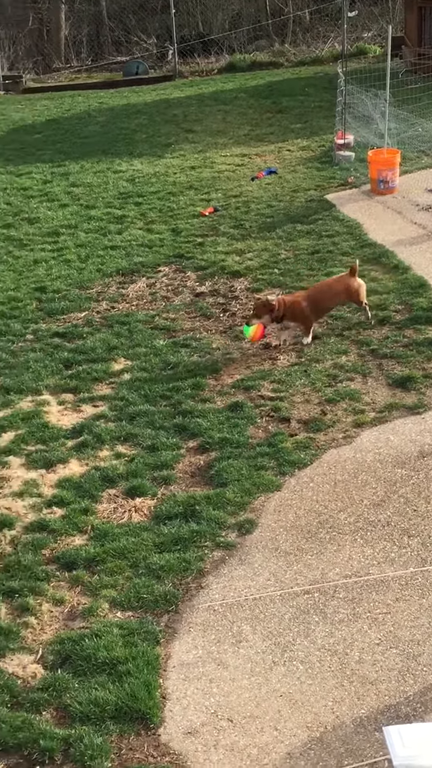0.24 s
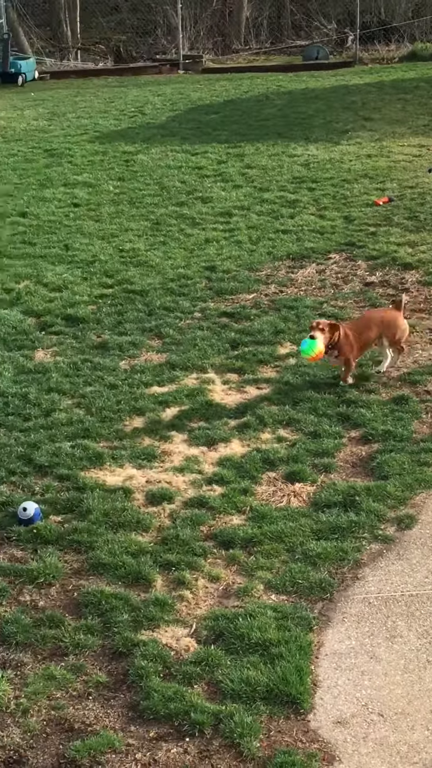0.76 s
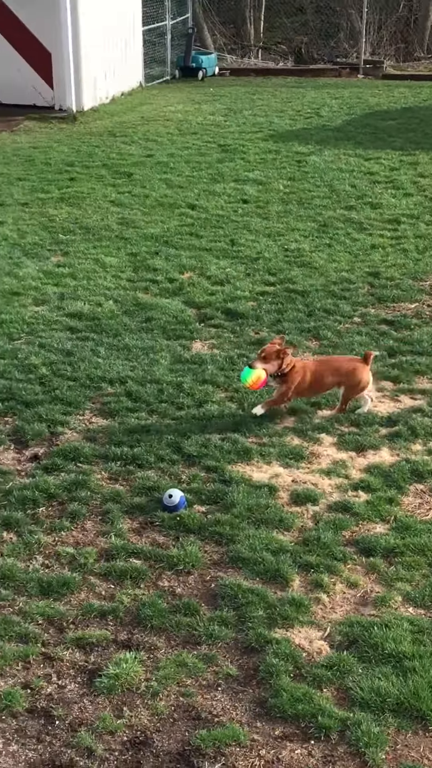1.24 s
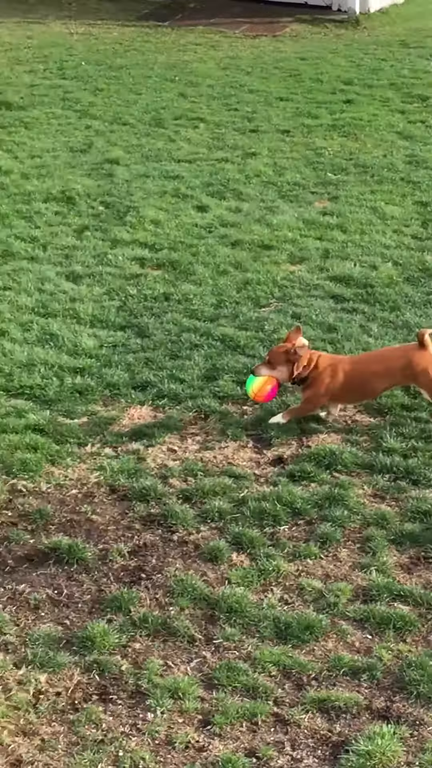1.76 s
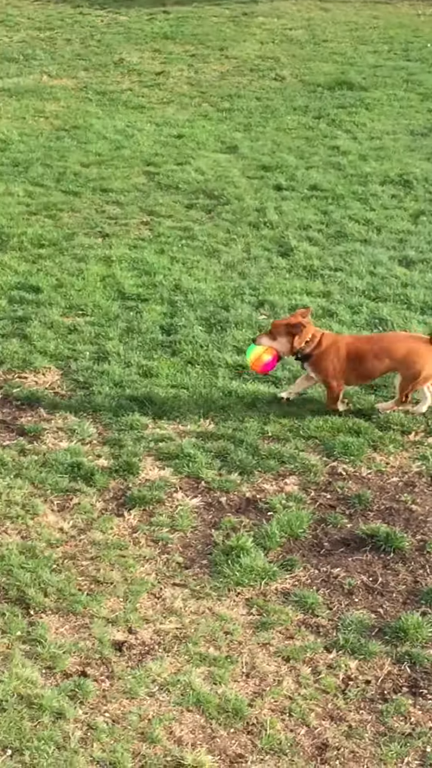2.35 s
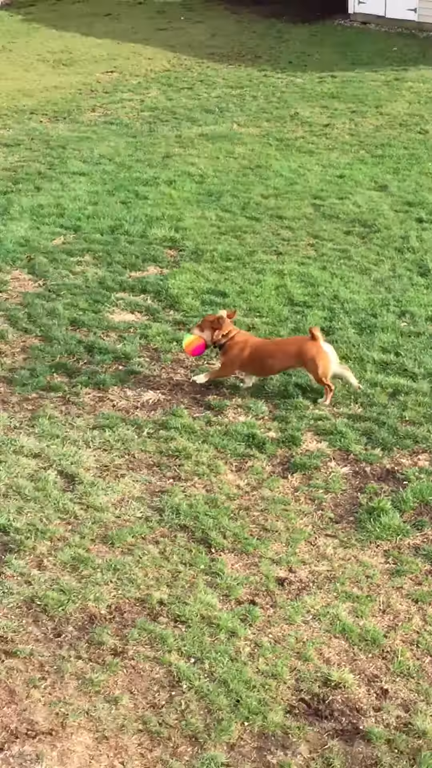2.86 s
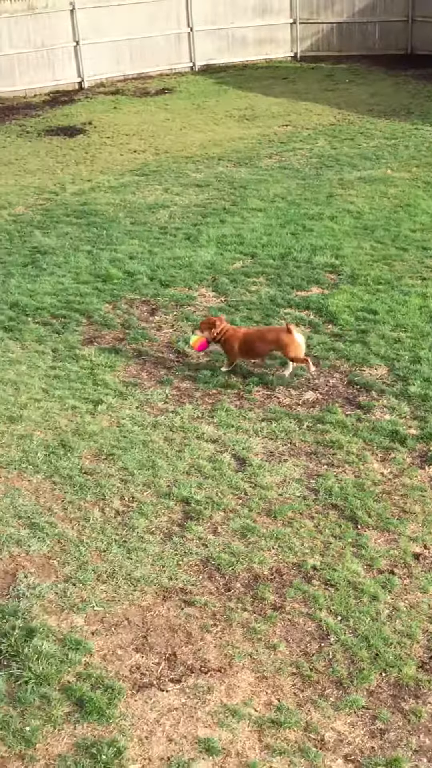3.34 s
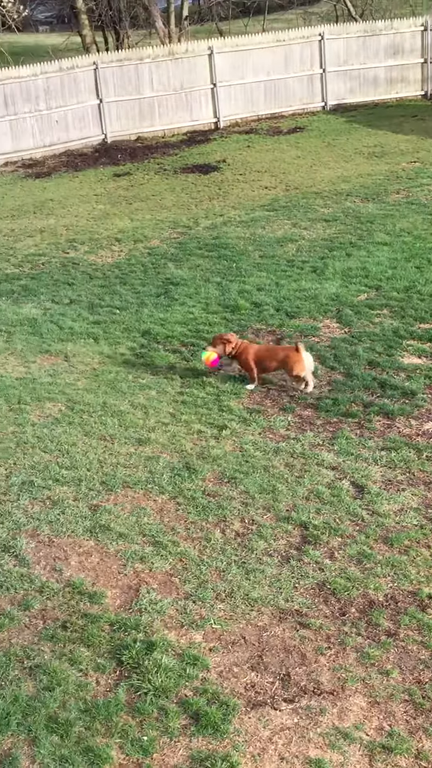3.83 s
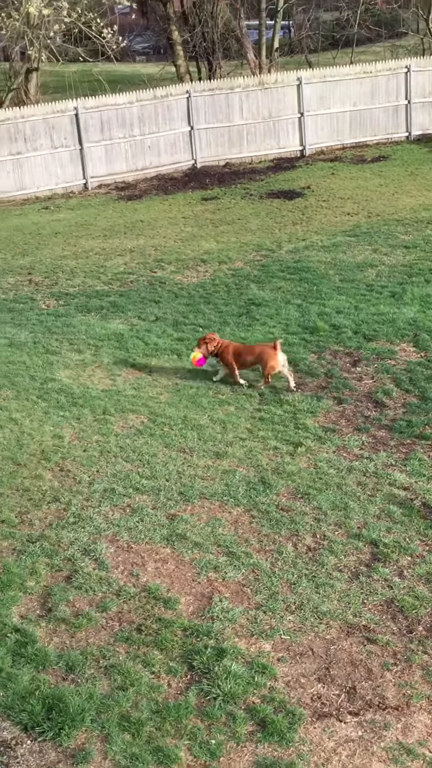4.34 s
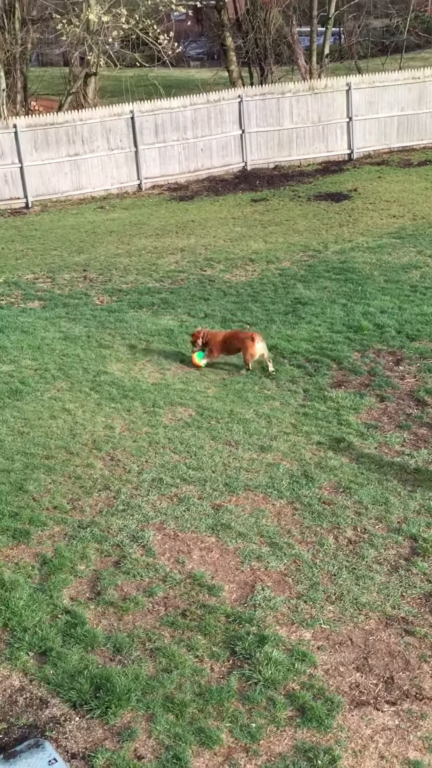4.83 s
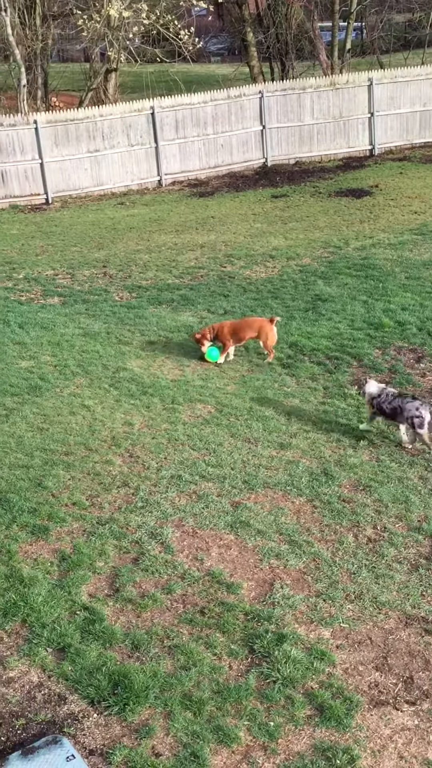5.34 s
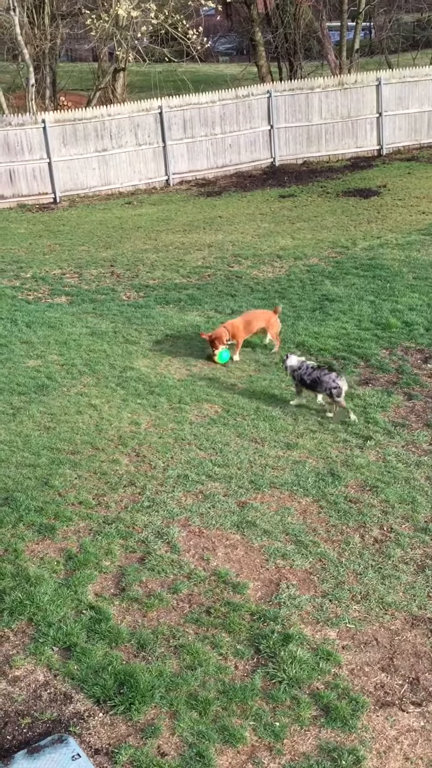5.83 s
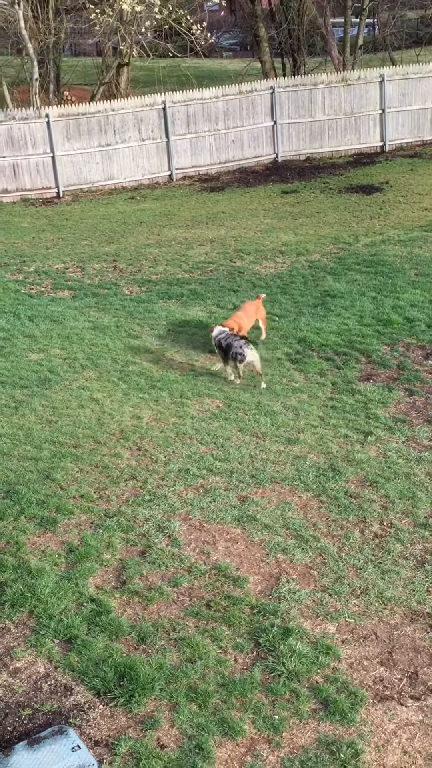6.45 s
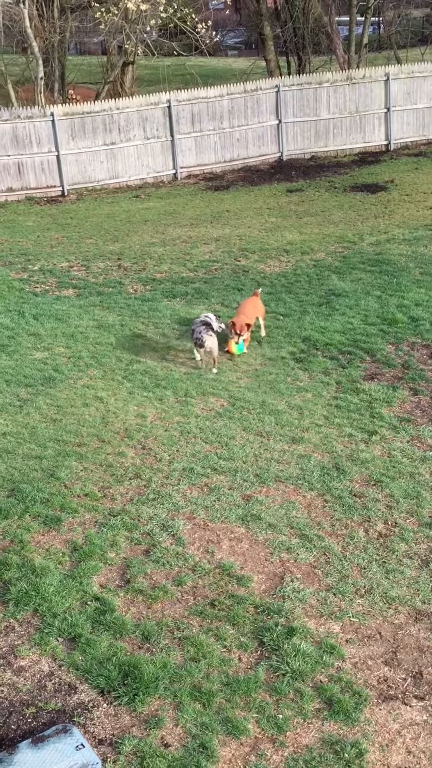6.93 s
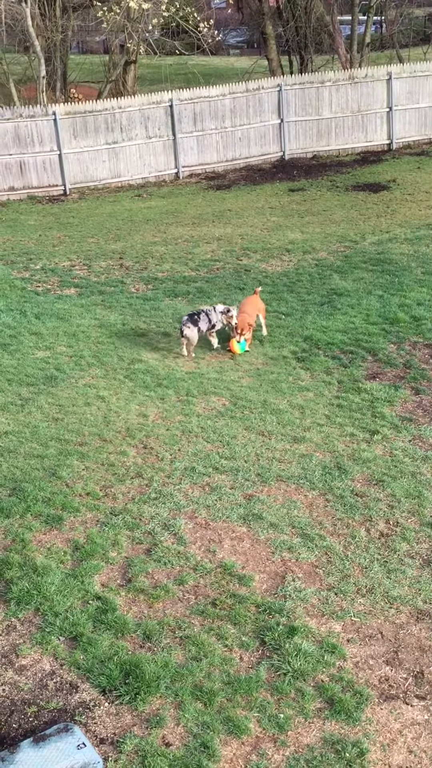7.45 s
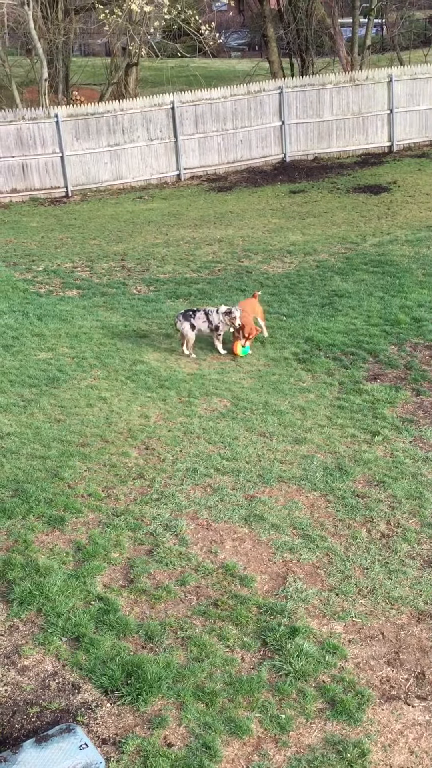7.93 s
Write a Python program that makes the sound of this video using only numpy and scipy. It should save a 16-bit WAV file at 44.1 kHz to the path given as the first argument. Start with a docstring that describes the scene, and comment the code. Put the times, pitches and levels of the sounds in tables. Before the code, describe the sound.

Metal dog tags jingle outdoors in light, irregular clusters for about eight seconds. They begin as dry, high clicks, busiest around 1 and 2 seconds and again near 4, then turn more ringing from about 4.5 seconds onward. Something hard and hollow is knocked now and then, most clearly at 3.6 seconds and again near 4.6 and 5. A bird chatters a quick run of about eight chirps from 4.5 to 5.2 seconds. At 7 seconds a dog gives one short, breathy snap among bright tag clashes. Far away, a faint caw comes near 2.2 seconds and a faint yelp near 4.1, with thin bird whistles scattered throughout. Underneath run a low rumble, a faint hum, soft outdoor hiss and barely audible scuffs in the grass. Light wind buffets the microphone, with a puff near 0.8 seconds and a swell around 7.

```python
"""Dog tags jingling on a lawn

Two dogs trot about a fenced lawn, and the metal tags on their collars clash, slide and ring.
Nearby, something hard and hollow is knocked, and a dog gives one gruff snap, a burst of air.
A bird chatters in two voices at once, while other birds whistle and animals call far away.
Under it all lie a low rumble, light wind on the microphone, a hum and faint scuffs in the grass."""
import sys
import numpy as np
from scipy import signal
from scipy.fft import rfft, irfft
from scipy.io import wavfile
from scipy.ndimage import uniform_filter1d

SR = 44100
rng = np.random.default_rng(int(sys.argv[2]) if len(sys.argv) > 2 else 0)


def transcribe(signal):
    """Save signal, clipped to [-1, 1], as a 16-bit WAV file at the path in sys.argv[1]."""
    frames = np.atleast_2d(signal).T
    limited = np.clip(frames, -1, 1)
    pcm = np.round(limited * 32767).astype(np.int16)
    wavfile.write(sys.argv[1], SR, pcm)


N = 361179

# Levels are relative: the functions turn them up or down. A ring_s is the time to fade by 60 dB.
# How strong each pitch is in three kinds of noise: pitch_hz, level_db
WIND_SPECTRUM = [(15, -18), (28, -30), (45, -3.5), (62, -1), (85, 1), (105, -2.5), (135, -5.5), (220, -16),
                 (500, -98)]
RUMBLE_SPECTRUM = [(60, -89), (110, 6), (140, 2.5), (175, -1.5), (215, 1.5), (265, -1.5), (320, -6),
                   (370, -10.5), (430, -25), (600, -28.5), (1200, -47)]
AIR_SPECTRUM = [(200, 7), (450, 2.5), (800, 4.5), (1100, 2), (1600, -3), (2500, -6), (4000, -10.5),
                (7000, -13.5), (12000, -20.5), (15500, -26)]
# Slow rise and fall of the wind and the rumble: time_s, level_db
WIND_LEVELS = [(0.0, -57), (0.77, -47.5), (1.07, -52), (2.3, -50), (2.6, -58.5), (2.83, -55.5),
               (5.11, -59.5), (5.38, -52.5), (5.7, -57), (6.0, -51.5), (6.38, -60.5), (7.05, -42.5),
               (7.48, -49), (7.87, -55), (8.19, -50)]
RUMBLE_LEVELS = [(0, -54), (1.8, -56), (2.2, -47.5), (2.7, -52.5), (3.8, -51.5), (5.3, -48.5), (6.3, -51),
                 (7.0, -51), (8.19, -51.5)]
# Single puffs of wind: peak_s, half_length_s, wind_db, rumble_db
GUSTS = [(0.568, 0.011, -38.5, -59), (0.754, 0.014, -30, -38.5), (0.891, 0.012, -39, -47),
         (1.24, 0.13, -46, -51.5), (2.144, 0.057, -41.5, -65), (2.984, 0.038, -42.5, -68),
         (3.287, 0.038, -45.5, -48), (6.863, 0.028, -52, -49), (7.638, 0.018, -38.5, -58)]
# The tones of the hum: pitch_hz, level_db
HUM_TONES = [(119.9, -52.5), (239.8, -63), (359.7, -68.5)]
# Scuffs in the grass: peak_s, half_length_s, level_db
GRASS_SCUFFS = [(0.04, 0.053, -66.5), (0.197, 0.018, -72), (1.033, .03, -74), (1.24, 0.028, -69),
                (1.875, 0.048, -69.5), (2.977, 0.01, -62.5), (3.206, .006, -70), (5.452, 0.0069, -58.5)]
# Three far calls: time_s, pitch_hz, level_db, roughness (0 to 1)
YAP_SHAPE = [(.165, 523, -80, 0.4), (.185, 546, -67.5, 0.54), (.23, 545, -87, 0.6)]
CAW_SHAPE = [(2.155, 394.7, -81, 0.53), (2.18, 413.7, -57, 0.41), (2.205, 423, -57, 0.35),
             (2.24, 414, -58, 0.55), (2.265, 413, -66, .7), (2.30, 383, -74, .5)]
YELP_SHAPE = [(4.065, 758, -60, .2), (4.078, 838, -57, 0.39), (4.10, 941, -64, 0.45),
              (4.118, 980, -57.5, 0.55), (4.16, 1013, -70.5, 0.34), (4.2, 1030, -67, 0.3),
              (4.25, 986, -84, 0.51)]
# The pitches that each caller's throat boosts: pitch_hz, width_hz, level_db
YAP_BANDS = [(700, 260, 1), (1130, 200, 6), (1980, 800, 1)]
CAW_BANDS = [(1274, 330, -8), (1560, 100, -22)]
YELP_BANDS = [(1030, 300, 3.5), (1870, 440, 5.5), (3000, 1800, -11)]
# Far bird notes: start_s, length_s, start_hz, middle_hz, end_hz, level_db
FAR_WHISTLES = [(.095, 0.033, 2580, 2530, 2530, -65), (.28, 0.064, 2520, 2560, 2570, -84),
                (.955, 0.018, 1650, 1600, 1560, -61), (.975, 0.044, 3300, 3260, 3200, -63),
                (1.637, 0.027, 5900, 5550, 5050, -66), (1.755, 0.075, 6100, 6200, 6260, -65),
                (1.82, 0.049, 3230, 3220, 3270, -68), (3.345, 0.021, 6150, 5730, 5100, -60),
                (4.378, 0.029, 6050, 5640, 4830, -58), (4.96, .07, 2520, 2480, 2520, -53),
                (5.348, 0.15, 2380, 2480, 2580, -60.5), (5.957, 0.05, 5700, 5470, 5100, -70),
                (7.467, 0.25, 2340, 2560, 2590, -61), (7.957, 0.19, 2120, 2520, 2670, -62.5)]
# The chattering bird's chirps: start_s, level_db, pitch_factor, upper_voice_db
CHIRPS = [(4.478, -54.5, 0.895, -32), (4.563, -55, 1, -2.5), (4.648, -56.5, 1.03, -3),
          (4.736, -56, 1.05, 1), (4.823, -52.5, 1, -6), (4.922, -52.5, .99, -7), (5.017, -56, 1, -8),
          (5.146, -57, 0.99, -3)]
# A chirp's two voices, a stepped note and two upward flicks: time_in_chirp_s, pitch_hz, level_db
CHIRP_LOWER = [(0, 2760, -5.5), (.005, 2700, -4.5), (.014, 2680, -3.5), (.019, 3213, -3), (.03, 3300, -2.5),
               (.04, 3204, -12.5), (.052, 2910, -32)]
CHIRP_UPPER = [(.025, 3820, -11), (.031, 4260, -2), (.038, 4540, -6), (.043, 3880, -8), (.051, 4330, -7),
               (.057, 4620, -19), (.063, 4440, -27)]
# Hard knocks: start_s, level_db, contact_s, tilt_db_per_octave, hollow_hz, hollow_db
HARD_KNOCKS = [(0.681, -53, 0.0035, -9, 476, 11), (0.896, -63.5, 0.0025, 4, 800, -8),
               (1.211, -50.5, 0.0031, 21.5, 800, -5), (1.412, -60, .012, -14, 623, 10),
               (1.515, -56.5, 0.013, 12, 800, -10), (1.896, -58, 0.00485, 22, 800, -6),
               (2.397, -54, 0.0038, 11, 800, -11), (2.455, -58, 0.0024, 7, 800, -6.5),
               (3.563, -46.5, 0.0012, 1, 1100, 7.5), (3.632, -51.5, 0.002, 0, 800, 5),
               (3.645, -32, 0.0051, 0.5, 700, 5), (4.608, -42, 0.0162, -10, 826, 4.5),
               (4.674, -52, 0.0132, -15, 750, 9), (4.964, -44, 0.0026, -0.5, 784, 13.5),
               (5.95, -54.5, 0.0025, -12, 510, 9), (6.403, -55, 0.0017, -1, 1000, 3),
               (6.698, -59, 0.0077, 12, 800, -15)]
# The pitches boosted by the knocked object and by the snapping dog's throat: pitch_hz, width_hz, level_db
KNOCK_BANDS = [(1600, 200, -3.5), (2135, 225, 1.5), (2520, 140, -3.5), (3020, 840, -6.5), (4290, 83, -8),
               (4970, 520, -31)]
SNAP_BANDS = [(1000, 47, 6.5), (1410, 91, 4.5), (1690, 160, -5), (2160, 86, 0), (2640, 110, -8.5),
              (3300, 770, -15)]
# Loudness of the snap: time_s, level_db
SNAP_LEVELS = [(7.035, -51), (7.041, -54), (7.047, -41), (7.059, -41), (7.064, -46), (7.085, -59.5),
               (7.111, -55)]
# The natural tones of the two bunches of tags, "dry" and "ringing": pitch_hz, level_db, base_ring_s
DRY_TONES = [(3530, -19, .04), (6400, -11, .04), (7090, -3, .07), (7350, -10, .05), (8650, -11, .03),
             (9150, -3, .04), (9330, -2, .05), (9480, -4, .04), (9735, -5, .08), (11020, -3, .05),
             (11180, -2, .06), (11600, -6, .04), (12900, -13, .04), (13825, -6, .09), (14200, -4, .05),
             (15000, -10, .03), (15500, -6, .03)]
RINGING_TONES = [(3720, -13, .07), (4285, -6, .08), (4668, -6, .12), (4995, -14, .07), (5430, -13, .06),
                 (6365, -6, .1), (6700, -13, .05), (7200, -6, .09), (7325, -3, .12), (8700, -7, .13),
                 (9285, -4, .12), (9540, -4, .1), (10840, -2, .13), (11003, -5, .22), (11545, 0, .16),
                 (11680, -5, .08), (12780, -4, .09), (12940, -5, .15), (13395, -6, .1), (13610, -3, .1),
                 (14820, -8, .08), (15250, -8, .06), (15620, -6, .1)]
# Light tinkling between clashes: time_s, level_db
TINKLE_LEVELS = [(0.0, -61.5), (.5, -70.5), (0.84, -64), (1.14, -54), (1.35, -61), (2.6, -69.5),
                 (3.33, -64.5), (3.99, -47), (4.24, -58), (5.34, -58.5), (5.84, -48), (6.09, -68),
                 (7.4, -63.5), (7.57, -70), (7.89, -57), (8.19, -58)]
# Tags that swing clear and ring on: start_s, pitch_hz, level_db, ring_s
LONE_RINGS = [(.983, 7090, -48.5, 0.095), (2.425, 13200, -68, 0.21), (2.928, 5440, -55, 0.11),
              (2.928, 4650, -55, 0.1), (2.94, 8800, -60.5, 0.45), (3.384, 3540, -57.5, 0.15),
              (3.388, 7090, -55, 0.11), (3.867, 3620, -48.5, 0.042), (4.073, 7500, -58, 0.11),
              (4.455, 11100, -59, 0.63), (4.782, 7325, -68, 0.071), (5.227, 2335, -57, 0.14),
              (5.229, 4230, -49.5, 0.081), (5.229, 5050, -58, 0.1), (5.68, 4285, -62, 0.082),
              (5.76, 4240, -48, .06), (5.759, 4668, -50, 0.07), (5.893, 4230, -55, 0.07),
              (5.896, 4668, -64, 0.063), (7.114, 4240, -50, 0.053), (5.821, 3693, -52, .07),
              (5.821, 4678, -54, 0.18), (6.469, 8600, -62, .22), (6.698, 3580, -72, .35),
              (7.266, 3740, -42, 0.035), (6.648, 4690, -50, 0.054), (7.085, 6358, -45, 0.11),
              (7.225, 11500, -50, 0.17), (7.505, 11540, -57, 0.39), (7.565, 11100, -59, .2),
              (7.6, 10800, -68, 0.58), (7.885, 10826, -61, 0.61), (8.06, 10830, -66, .45),
              (7.808, 12850, -60, .25), (7.505, 3709, -68, 0.47), (7.503, 4650, -59, 0.4),
              (7.567, 4790, -63, .1), (7.806, 4700, -64, .08), (7.876, 4700, -61.5, 0.17),
              (7.95, 4275, -66, 0.19), (8.03, 3480, -64, 0.085)]
# Clear clashes of the tags: start_s, level_db, clatter_s, low_db, top_db, clink_hz, clink_share, bunch
# low_db (4-8 kHz) and top_db (12-16 kHz) are set against the band between; the share is of the energy.
TAG_CLASHES = [(0.194, -47.5, 0.00083, -16, 4, 10900, 0.35, "dry"),
               (0.681, -51.5, 0.00034, 1, -2, 5700, 0.17, "dry"),
               (.718, -64, 0.0088, -13, -3, 7040, .3, "dry"), (.8, -47, 0.00065, 1, 2, 11850, .1, "dry"),
               (.873, -41, 0.0048, -7, 7, 9660, 0.38, "dry"),
               (.885, -39.5, 0.0063, -4, -8, 9300, 0.23, "dry"),
               (0.98, -42.5, 0.0022, -14, -4, 14400, .2, "dry"),
               (1.047, -50.5, 0.00092, -10, -10, 10000, .15, "dry"),
               (1.157, -50.5, .001, -11, -6, 11213, 0.65, "dry"),
               (1.181, -50.5, .016, -4, -1, 11154, .1, "dry"),
               (1.211, -35.5, 0.001, -16, -6, 9300, .05, "dry"),
               (1.226, -59, 0.0046, -8, -2, 9324, .1, "dry"),
               (1.306, -53.5, 0.0034, -7, -7, 8150, 0.13, "dry"),
               (1.516, -44, 0.0039, -2.5, 0, 9300, 0.14, "dry"),
               (1.539, -54, .004, -9, -4, 9400, .1, "dry"), (1.566, -60, .002, -6, 0, 9800, .1, "dry"),
               (1.7, -60, 0.0076, -2, -2, 9755, .1, "dry"), (1.806, -55.5, 0.023, -1, -5, 9270, .2, "dry"),
               (1.838, -48.5, 0.011, -9, -13, 9270, 0.22, "dry"),
               (1.9, -41.5, .004, -2, 4.5, 9690, .1, "dry"), (1.915, -45, 0.0041, -9, -7, 9350, .2, "dry"),
               (2.202, -56, 0.0035, 0, -3, 11057, 0.54, "dry"),
               (2.236, -44.5, 0.0036, -2.5, -3, 11270, .3, "dry"),
               (2.267, -43, 0.00064, -22, -11, 11300, 0.32, "dry"),
               (2.303, -51, 0.005, -5, -4, 11418, .2, "dry"),
               (2.32, -41.5, 0.0027, -10, 1, 11240, 0.2, "dry"),
               (2.335, -55, 0.0058, -1, 3, 11041, .1, "dry"),
               (2.424, -57, 0.0097, -7, 0, 13000, .6, "ringing"),
               (2.524, -63, .018, -11, -11, 11590, .2, "ringing"),
               (2.911, -51, .0098, 3, 0, 12877, .1, "ringing"),
               (2.927, -49.5, 0.019, -6, -1, 12893, .3, "ringing"),
               (3.053, -42.5, 0.0012, -9, -7, 9170, 0.11, "dry"),
               (3.079, -55, 0.0018, -13, -4, 10900, .5, "ringing"),
               (3.129, -51.5, 0.0053, 0, -2, 9345, 0.35, "ringing"),
               (3.384, -50, 0.014, -1, -1, 7080, 0.25, "dry"),
               (3.408, -44.5, 0.0046, -7, 0, 12995, 0.23, "ringing"),
               (3.472, -47, 0.0044, -20, -2, 13690, .2, "dry"),
               (3.69, -57, 0.0066, -6, -3, 11100, 0.43, "ringing"),
               (3.747, -34.5, 0.0044, -14.5, -16, 9090, 0.7, "dry"),
               (3.837, -50.5, 0.0093, -10, -7, 9500, .1, "dry"),
               (3.866, -37.5, 0.0034, -8.5, -1, 9150, 0.61, "dry"),
               (3.924, -44, .001, -17, -14, 9800, .2, "dry"),
               (3.939, -52.5, 0.0065, 0, -5, 9787, .2, "dry"), (3.972, -39, .0012, -7, -2, 9690, .1, "dry"),
               (3.985, -47, .002, -14, -8, 9292, .3, "dry"),
               (3.996, -49, 0.0014, -13, -11, 9450, .3, "dry"), (4.044, -52, .002, 1, -5, 12000, .4, "dry"),
               (4.071, -41, .0015, -18, -5, 9655, 0.16, "dry"),
               (4.143, -54, .002, -9, -20, 9500, 0.62, "dry"),
               (4.185, -47, 0.0025, -25, -3, 9340, 0.38, "dry"), (4.21, -59, .002, -2, 2, 12726, .6, "dry"),
               (4.289, -57, 0.0036, -14, -7, 11633, 0.35, "ringing"),
               (4.45, -33.5, 0.0029, -8, -2, 7380, 0.5, "ringing"),
               (4.456, -38.5, 0.0077, -5, 4, 10998, 0.21, "ringing"),
               (4.526, -54, 0.013, -5, -13, 10804, .2, "ringing"),
               (4.616, -51, 0.007, -4, 4, 12725, .7, "ringing"),
               (4.646, -51.5, 0.013, -4, -1, 11671, 0.12, "ringing"),
               (4.779, -45.5, 0.0038, -3, -6, 9249, .2, "dry"),
               (4.834, -47.5, 0.014, -3, 5, 12600, .2, "ringing"),
               (4.878, -57, 0.011, -5, -1, 4450, 0.17, "ringing"),
               (5.043, -51.5, 0.0083, -7, -6, 8656, .2, "ringing"),
               (5.113, -60, .004, -12, -5, 11596, 0.93, "ringing"),
               (5.177, -56, .008, 6, -8, 11020, 0.27, "ringing"),
               (5.228, -45, 0.026, -6, -3, 9288, .4, "ringing"),
               (5.287, -49.5, 0.0079, -3, -1, 11547, .7, "ringing"),
               (5.443, -60, 0.0051, 2, 0, 7284, .2, "ringing"),
               (5.487, -51, 0.0039, -10, -6, 10900, .2, "ringing"),
               (5.512, -63, 0.012, 0, 1, 9771, .2, "ringing"),
               (5.611, -54.5, .011, 2, 5, 6190, 0.35, "dry"),
               (5.646, -55.5, 0.019, 6, 5, 11100, 0.18, "ringing"),
               (5.671, -54, 0.011, -4, 0, 10990, 0.22, "ringing"),
               (5.757, -49, 0.0082, -1, -7, 10700, 0.15, "ringing"),
               (5.826, -45.5, 0.013, -3, -1, 11663, 0.76, "ringing"),
               (5.895, -43, 0.0062, -5.5, -5, 11600, 0.29, "ringing"),
               (6.026, -50.5, 0.011, -1, 6, 13138, .3, "ringing"),
               (6.133, -48.5, 0.0043, 1, -4, 4310, 0.18, "ringing"),
               (6.243, -51.5, 0.0087, 2, 2, 13060, .4, "ringing"),
               (6.348, -58, .006, 1, -7, 9609, .5, "ringing"),
               (6.366, -41.5, 0.0044, 3, 8.5, 9531, 0.76, "ringing"),
               (6.393, -67, 0.0072, 10, 4, 12915, .3, "ringing"),
               (6.466, -45, 0.0028, -14, -10, 11580, 0.66, "ringing"),
               (6.616, -49.5, 0.0055, 2, -3, 11530, .2, "ringing"),
               (6.646, -38, 0.0067, -6.5, -4, 11585, 0.23, "ringing"),
               (6.682, -55, 0.0077, -9, -7, 10800, .3, "ringing"),
               (6.767, -64, 0.0068, -9, -8, 10826, 0.18, "ringing"),
               (6.917, -59, .004, -14, -10, 11600, 0.8, "dry"),
               (7.008, -44.5, 0.0024, -23, -20, 15299, .3, "dry"),
               (7.06, -43, 0.0064, 1, -1, 10982, 0.23, "ringing"),
               (7.083, -38.5, 0.0038, 2, 8, 7170, 0.32, "ringing"),
               (7.114, -35.5, 0.0042, 2.5, -5, 7185, 0.11, "ringing"),
               (7.223, -43.5, 0.0065, -6, 2, 12900, 0.23, "ringing"),
               (7.263, -44.5, 0.0099, -4, -8, 11540, 0.34, "ringing"),
               (7.304, -50.5, 0.0099, 7, -1, 12812, .1, "ringing"),
               (7.327, -53, .003, 3, -4, 10826, .3, "ringing"),
               (7.504, -51, 0.0092, -11, -11, 9300, 0.36, "ringing"),
               (7.567, -52.5, .018, -17, -8, 6395, 0.27, "ringing"),
               (7.684, -53, 0.0082, -9, -7, 11430, 0.46, "ringing"),
               (7.718, -52, 0.00087, -7, -2, 15300, .3, "dry"),
               (7.806, -53.5, 0.0038, -2, 6, 13523, .3, "ringing"),
               (7.873, -52.5, .014, -5, 4, 10826, 0.58, "ringing"),
               (7.974, -51.5, 0.0038, -2, -6, 11670, .3, "ringing"),
               (8.014, -45, 0.02, -4.5, 1.5, 13631, .2, "ringing"),
               (8.061, -49, 0.0054, 1, 1, 15630, 0.74, "ringing")]

TREBLE_LIMIT_HZ = 16050
CLASH_FOLLOW = 0.63  # how closely soft touches and slides follow their clash's level (0 to 1)


def gain_of(db):
    """Turns decibels into a number to multiply by."""
    return 10 ** (np.asarray(db) / 20)


def evened(x):
    """Scales a sound to an average (rms) level of 1."""
    return x / np.sqrt(np.mean(x ** 2) + 1e-20)


def peaked(x, span_s=0.019):
    """Scales a sound so that its loudest stretch has an average level of 1."""
    return x / np.sqrt(uniform_filter1d(x ** 2, size=max(round(span_s * SR), 1)).max() + 1e-20)


def add(mix, s, sound):
    """Mixes a sound in at s seconds."""
    part = mix[max(round(s * SR), 0):][:len(sound)]
    part += sound[:len(part)]


def curve(t, points):
    """Joins (time, value) points with straight lines and reads them at t."""
    return np.interp(t, *np.transpose(points))


def shaped_noise(spectrum):
    """Steady noise with the given strength at each pitch."""
    hz, db = np.transpose(spectrum)
    shape = gain_of(np.interp(np.log(np.fft.rfftfreq(N, 1 / SR) + 1), np.log(hz), db))
    return evened(irfft(rfft(rng.standard_normal(N)) * shape, N))


def drift(n, per_s):
    """A random wobble that heads for a new value per_s times a second."""
    knots = rng.standard_normal(4096)
    return evened(np.interp(np.arange(n) * per_s / SR, np.arange(len(knots)), knots))


def resonate(x, bands):
    """Brings out a few bands of pitch, as a throat or a hollow object does."""
    return sum((-1) ** k * gain_of(db) * signal.lfilter(*signal.iirpeak(hz, hz / width, SR), x)
               for k, (hz, width, db) in enumerate(bands))


def yard_echo(x, ring_s, gap_s):
    """Scattered echoes bounce back from fence, house and trees."""
    t = np.arange(SR) / SR
    echoes = rng.standard_normal(SR) * (rng.random(SR) < 3000 / SR)
    echoes *= gain_of(-60 * t / ring_s) * (t > gap_s)
    return signal.fftconvolve(x, echoes / np.linalg.norm(echoes))[:N]


def wind_and_rumble():
    """An uneven breeze on the microphone and a low rumble; gusts push both up."""
    t = np.arange(N) / SR
    breeze = gain_of(3 + curve(t, WIND_LEVELS) + 2 * drift(N, per_s=12))
    rumble = gain_of(curve(t, RUMBLE_LEVELS) + 2 * drift(N, per_s=7))
    for s, half_length_s, wind_db, rumble_db in GUSTS:
        gust = np.exp(-((t - s) / half_length_s) ** 2)
        breeze = np.hypot(breeze, gain_of(wind_db) * gust)
        rumble = np.hypot(rumble, gain_of(rumble_db) * gust)
    return breeze * shaped_noise(WIND_SPECTRUM) + rumble * shaped_noise(RUMBLE_SPECTRUM)


def hum():
    """Three low tones waver gently and sound like an electric hum."""
    t = np.arange(N) / SR
    return sum(np.sqrt(2) * gain_of(db + 1.86 * drift(N, per_s=2.297))
               * np.sin(2 * np.pi * hz * t + 0.098 * drift(N, per_s=2.98)) for hz, db in HUM_TONES)


def open_air():
    """The soft, nearly steady hiss of the outdoors."""
    return gain_of(-64 + .6 * drift(N, per_s=6)) * shaped_noise(AIR_SPECTRUM)


def grass_scuffs():
    """Brushed grass gives short swells of grainy noise."""
    t = np.arange(N) / SR
    swell = sum(gain_of(db) * np.exp(-((t - s) / half_s) ** 2) for s, half_s, db in GRASS_SCUFFS)
    grain = gain_of(3 * drift(N, per_s=500))
    hiss = shaped_noise([(250, -42), (900, -8), (2800, -1), (4200, -5.5), (7000, -10.5), (15000, -45)])
    return swell * grain * hiss


def far_call(shape, throat, jitter):
    """An animal's voice: unsteady pulses and puffs of breath pass through its throat."""
    s, *columns = np.transpose(shape)
    t, out = np.arange(s[0], s[-1], 1 / SR), np.zeros(N)
    hz, db, rough = (np.interp(t, s, column) for column in columns)
    cycles = np.cumsum(hz * (1 + jitter * drift(len(t), per_s=303.5))) / SR
    pulses = evened(sum(np.cos(2 * np.pi * k * cycles) for k in range(1, 5)))
    puffs = rng.standard_normal(len(t)) * (1 + np.cos(2 * np.pi * cycles))
    buzz = (1 - rough) * pulses + 2 * rough * puffs
    voice = sum(gain_of(level) * resonate(resonate(buzz, [(f, width, 0)]), [(f, width, 0)])
                for f, width, level in throat)
    add(out, s[0], gain_of(db) * evened(voice))
    return out


def whistle(points, pitch_factor=1, waver=0.014, wavers_per_s=400):
    """A wavering tone slides along (time_s, pitch_hz, level_db) points; returns its start and sound."""
    s, hz, db = np.transpose(points)
    t = np.arange(s[0], s[-1], 1 / SR)
    pitch = pitch_factor * np.interp(t, s, hz) * (1 + waver * drift(len(t), wavers_per_s))
    return s[0], np.sqrt(2) * gain_of(np.interp(t, s, db)) * np.sin(2 * np.pi * np.cumsum(pitch) / SR)


def far_birds(twitters_per_s=5, twitter_s=0.051):
    """Birds in the trees whistle thin notes over a faint random twitter from farther off."""
    out = np.zeros(N)
    for s, length_s, start_hz, middle_hz, end_hz, db in FAR_WHISTLES:
        note = [(s, start_hz, db - 8), (s + length_s / 2, middle_hz, db), (s + length_s, end_hz, db - 8)]
        add(out, *whistle(note, waver=.01, wavers_per_s=160))
    for when, pitch, bend, size in rng.random((round(twitters_per_s * N / SR), 4)):
        s, hz, db = when * N / SR, 1600 + 1800 * pitch, -80 + 6 * size
        middle = (s + twitter_s / 2, hz * (.95 + .1 * bend), db)
        add(out, *whistle([(s, hz, db - 10), middle, (s + twitter_s, hz, db - 10)]))
    return gain_of(-3.5 + 3 * drift(N, per_s=60)) * out


def chattering_bird(flutter_db=4.5):
    """Quick two-voiced chirps, each at its own pace; the lower voice starts with a weak octave on top."""
    out = np.zeros(N)
    for s, db, pitch_factor, upper_db in CHIRPS:
        stretch = [1 + 0.092 * rng.uniform(-0.73, 1), 1, 1]  # changes only the time column
        voices = (CHIRP_LOWER, 1, 0), (CHIRP_LOWER[:3], 2, -7), (CHIRP_UPPER, 1, upper_db)
        for points, multiple, voice_db in voices:
            tuning = pitch_factor * multiple * rng.uniform(.975, 1.025)
            start_s, sound = whistle(np.multiply(points, stretch), tuning, waver=.022)
            flutter = flutter_db * drift(len(sound), per_s=245)
            add(out, s + start_s, gain_of(db + voice_db + flutter) * sound)
    return out


def knocks(blow_db=22, rattle_db=-19, rattle_s=0.028, hollow_width_hz=80):
    """A blow, a short rough contact and a weak rattle make a hard, hollow object ring."""
    out, t = np.zeros(N), np.arange(8192) / SR
    octaves = np.log2(np.clip(np.fft.rfftfreq(len(t), 1 / SR), 900, 7000) / 2000)
    soften = signal.butter(3, 7000, fs=SR, output="sos")
    for s, db, contact_s, tilt_db, hollow_hz, hollow_db in HARD_KNOCKS:
        fade = np.exp(-(t / contact_s) ** 4) + gain_of(rattle_db) * np.exp(-t / rattle_s)
        force = rng.standard_normal(len(t)) * fade
        force[round(contact_s * SR / 4)] += gain_of(blow_db)
        body = resonate(force, [(hollow_hz, hollow_width_hz, hollow_db)] + KNOCK_BANDS)
        tilted = irfft(rfft(signal.sosfilt(soften, body)) * gain_of(tilt_db * octaves))
        add(out, s, gain_of(db) * peaked(tilted[:len(t) // 2]))
    return out


def dog_snap():
    """A burst of air rushes through a dog's open jaws."""
    s, db = np.transpose(SNAP_LEVELS)
    t, out = np.arange(s[0], s[-1], 1 / SR), np.zeros(N)
    band = signal.butter(3, [850, 4200], "band", fs=SR, output="sos")
    breath = signal.sosfilt(band, rng.standard_normal(len(t)))
    add(out, s[0], gain_of(np.interp(t, s, db)) * evened(resonate(breath, SNAP_BANDS)))
    return out


def rasp(force):
    """Metal rubbing on metal: keeps only the high, scratchy part of the force."""
    return signal.lfilter(*signal.butter(2, [6000, 14500], "band", fs=SR), force)


def struck_tone(blows, hz, ring_s):
    """Each blow starts one tone of a tag, which then dies away."""
    return signal.lfilter([1], [1, -np.exp((2j * np.pi * hz - np.log(1000) / ring_s) / SR)], blows).real


def contact_colour(sound, low_db, top_db):
    """Tags that meet flat favour their low tones; tags that meet edge-on favour the top ones."""
    spectrum, f = rfft(sound), np.fft.rfftfreq(len(sound), 1 / SR)
    low, middle, top = (10 * np.log10(np.sum(abs(spectrum[(f > hz) & (f < hz + 4000)]) ** 2))
                        for hz in (4000, 8000, 12000))
    boost_db = np.interp(f, [7400, 8600, 11600, 12700],
                         [low_db - low + middle, 0, 0, top_db - top + middle])
    return irfft(spectrum * gain_of(boost_db) / (1 + (f / TREBLE_LIMIT_HZ) ** 120), len(sound))


def clash(tones, clatter_s, low_db, top_db, scratch_db, damping, clink=None, uneven_db=6):
    """Tags meet and bounce; each bounce hits another spot, so their tones ring unevenly."""
    t = np.arange(SR // 4) / SR
    hz, db, ring_s = np.transpose(tones)
    # How the tags lie together shifts each tone's strength, pitch and ring time.
    strength, shift, grip = rng.standard_normal((3, len(hz)))
    hz = hz * (1 + 0.00635 * shift)
    db = db + uneven_db * np.clip(strength, -2, 1.2)
    ring_s = ring_s * np.exp(np.minimum(grip - .4, .1))
    ring_s /= 1 + damping * np.exp(-clatter_s / 0.0035)  # brief touches leave the tags pressed together
    # A brief touch starts hard; a long clatter builds up.
    swell = 1 - np.exp(-t / (.0013 + .2 * clatter_s))
    bounces = (rng.random(len(t)) < 800 / SR) * gain_of(-3)  # about 800 a second
    bounces *= np.exp(-(t / (clatter_s + 0.001) - .4) ** 2 * 2)
    bounces[0] = 1 / (1 + (clatter_s / 0.016) ** 2) + .12
    hits = np.flatnonzero(bounces > .02)[:64]
    spots = (rng.standard_normal((len(hz), 64, 2)) @ [1, 1j])[:, :len(hits)]
    ring = np.zeros(len(t))
    for tone_hz, tone_db, tone_s, spot in zip(hz, db, ring_s, spots):
        blows = np.zeros(len(t), complex)
        blows[hits] = bounces[hits] * spot
        ring += gain_of(tone_db) * struck_tone(blows, tone_hz, tone_s)
    # While the tags still touch they scratch, most strongly near their own tones.
    pressure = signal.lfilter([1], [1, -np.exp(-1 / (0.0014 * SR))], bounces)
    scratch = rasp(pressure * rng.standard_normal(len(t)))
    off_tone_hz = abs(np.fft.rfftfreq(len(t), 1 / SR)[:, None] - hz).min(1)
    scratch = irfft(rfft(scratch) * gain_of(-11 * np.minimum(off_tone_hz / 500, 1)), len(t))
    scratch = gain_of(scratch_db + 88 * np.exp(-clatter_s / 0.0013)) * peaked(scratch)
    sound = contact_colour((peaked(ring) + scratch) * swell, low_db, top_db)[:-500]
    if clink:
        # The first blow makes one tone stand out as a clink; later bounces only nudge it.
        clink_hz, share, clink_s = clink
        clink_s /= 1 + np.exp(-clatter_s / .002)
        nudges = .35 * bounces * np.exp(2j * np.pi * rng.random(len(t)))
        nudges[0] = 1
        tone = struck_tone(nudges, clink_hz, clink_s) * swell
        sound = np.sqrt(1 - share) * evened(sound) + np.sqrt(share) * evened(tone[:len(sound)])
    return peaked(sound, span_s=.003 + clatter_s / 2)


def sliding_tags(bunch, tones, tinkle_db, swing_db, damping, rasp_db, grazes_per_s=200):
    """Tags slide over each other; many tiny grazes keep them shimmering, most around each clash."""
    t = np.arange(0, N / SR, .002)
    clash_s, clash_db = np.transpose([row[:2] for row in TAG_CLASHES])
    since_s = t[:, None] - clash_s
    nearness = np.exp(-abs(since_s) / np.where(since_s > 0, .03, .014))  # quick rise, slower fall
    swing_gain = gain_of(swing_db + clash_db.mean() + CLASH_FOLLOW * (clash_db - clash_db.mean()))
    swing = (swing_gain * nearness).max(1)
    moving = np.array([row[-1] == bunch for row in TAG_CLASHES])[abs(since_s).argmin(1)]
    motion = moving * np.hypot(swing, gain_of(tinkle_db + curve(t, TINKLE_LEVELS)))
    ring, contacts, count = np.zeros(N), np.zeros(N), round(grazes_per_s * N / SR)
    for hz, db, ring_s in tones:
        width_hz = damping * np.log(1000) / np.pi / ring_s
        hits = rng.integers(0, N, 8192)[:count]
        force = rng.standard_normal(8192)[:count] * np.interp(hits / SR, t, motion)
        # Each tone grows and fades on its own.
        wander_db = 6 * np.interp(hits / SR * 20, np.arange(1024), rng.standard_normal(1024))
        grazes = np.zeros(N)
        grazes[hits] = force * gain_of(db + wander_db) * np.sqrt(SR / grazes_per_s / len(tones))
        ring += resonate(grazes + 1e-12, [(hz, width_hz, 0)]) * np.sqrt(SR / np.pi / width_hz)
        contacts += grazes
    return ring + gain_of(rasp_db) * rasp(contacts)


def soft_touches(strays_per_s=7, variants=20):
    """Tags touch lightly after each clash and at random, on the bunch that clashes nearest in time."""
    sounds = {}
    for bunch, tones, scratch_db in ("dry", DRY_TONES, -6), ("ringing", RINGING_TONES, -20):
        sounds[bunch] = [clash(tones, clatter_s, low_db=-6.5, top_db=-2, scratch_db=scratch_db,
                               damping=3, uneven_db=13)
                         for clatter_s in np.geomspace(.002, .014, variants)]
    clash_s, clash_db = np.transpose([row[:2] for row in TAG_CLASHES])
    lag_s = 0.011 + 0.022 * abs(rng.standard_normal(len(clash_s)))
    touches = list(zip(clash_s + lag_s, -63 + CLASH_FOLLOW * (clash_db - clash_db.mean())))
    stray_s = np.flatnonzero(rng.random(N) < strays_per_s / SR) / SR
    touches += [(s, curve(s, TINKLE_LEVELS) - 5) for s in stray_s]
    out = np.zeros(N)
    for (s, db), (pick, size) in zip(touches, rng.random((len(touches), 2))):
        bunch = TAG_CLASHES[np.argmin(abs(clash_s - s))][-1]
        add(out, s, gain_of(db + 8 * size - 6) * sounds[bunch][int(pick * variants)])
    return out


def lone_rings(rise_s=0.0014, twin_gain=0.28):
    """A tag hanging clear rings on in one tone; a close twin tone makes it throb a little."""
    out, t = np.zeros(N), np.arange(SR // 3) / SR
    for (s, hz, db, ring_s), (phase, split) in zip(LONE_RINGS, rng.random((len(LONE_RINGS), 2))):
        twin_hz = hz + 38 * (.5 + split)
        pair = np.sin(2 * np.pi * hz * t) + twin_gain * np.sin(2 * np.pi * (twin_hz * t + phase))
        add(out, s, np.sqrt(2) * gain_of(db - 60 * t / ring_s) * (1 - np.exp(-t / rise_s)) * pair)
    return out


def jingle(bunch, tones, scratch_db, damping, base_clink_s):
    """One collar swings, and its bunch of tags clashes again and again."""
    out = np.zeros(N)
    for s, db, clatter_s, low_db, top_db, clink_hz, share, which in TAG_CLASHES:
        if which == bunch:
            clink = (clink_hz, share, base_clink_s)
            add(out, s, gain_of(db) * clash(tones, clatter_s, low_db, top_db, scratch_db, damping, clink))
    return gain_of(-1.5) * out


def scene():
    """Mixes the lawn in mono: near sounds get a short echo, far ones a longer, stronger one."""
    background = wind_and_rumble() + hum() + open_air()
    near = knocks() + dog_snap()
    bird = chattering_bird()
    calls = far_call(CAW_SHAPE, CAW_BANDS, jitter=0.039)
    calls += far_call(YELP_SHAPE, YELP_BANDS, jitter=0.024)
    calls += far_call(YAP_SHAPE, YAP_BANDS, jitter=0.03)
    whistles = far_birds()
    tags = jingle("dry", DRY_TONES, scratch_db=-3, damping=0.67, base_clink_s=0.034)
    tags += jingle("ringing", RINGING_TONES, scratch_db=-12, damping=4, base_clink_s=.085)
    tags += lone_rings()
    tags += sliding_tags("dry", DRY_TONES, tinkle_db=-14, swing_db=-22, damping=1.6, rasp_db=-10)
    tags += sliding_tags("ringing", RINGING_TONES, tinkle_db=-10, swing_db=-19, damping=1.7, rasp_db=-23)
    echoes = gain_of(-15) * yard_echo(tags, ring_s=0.035, gap_s=0.0088)
    echoes += gain_of(-10) * yard_echo(near, ring_s=0.08, gap_s=0.0016)
    echoes += gain_of(-3.5) * yard_echo(bird, ring_s=0.18, gap_s=0.003)
    echoes += yard_echo(calls, ring_s=1.4, gap_s=0.0022)
    echoes += gain_of(-5) * yard_echo(whistles, ring_s=.3, gap_s=.003)
    animals = gain_of(-4.5) * bird + gain_of(5.5) * calls + gain_of(-4) * whistles
    return (background + animals + near + tags + soft_touches() + grass_scuffs() + echoes)[None]


def record(dry):
    """Cuts away the very highest treble."""
    treble_cut = signal.firwin(401, TREBLE_LIMIT_HZ, window=("kaiser", 8), fs=SR)
    return signal.oaconvolve(dry, treble_cut[None], "same")


dry = scene()
out = record(dry)
transcribe(out)
```